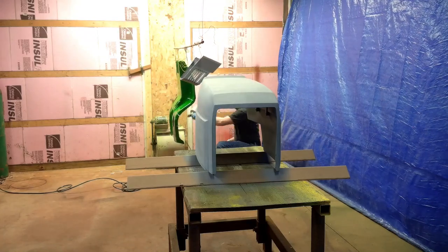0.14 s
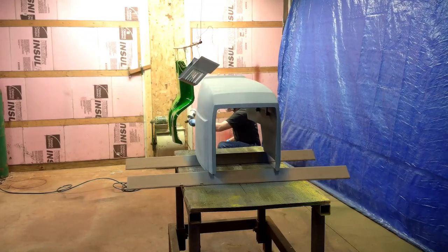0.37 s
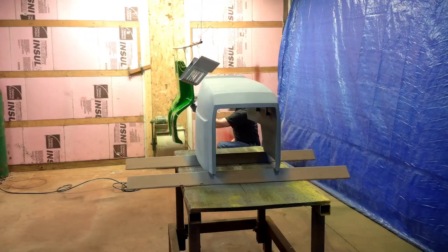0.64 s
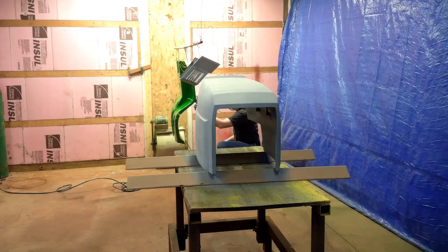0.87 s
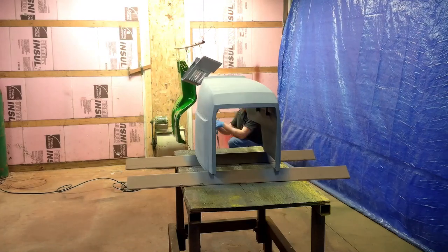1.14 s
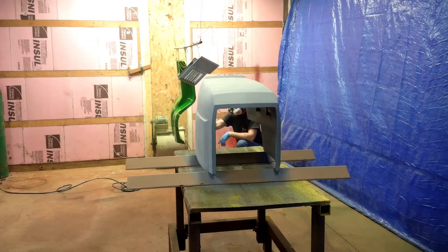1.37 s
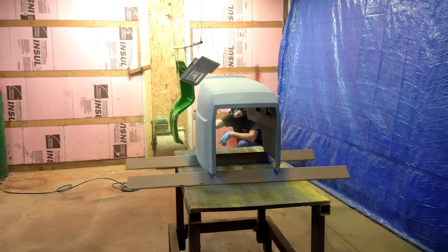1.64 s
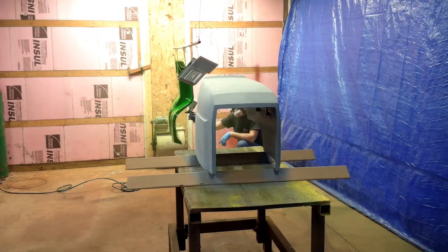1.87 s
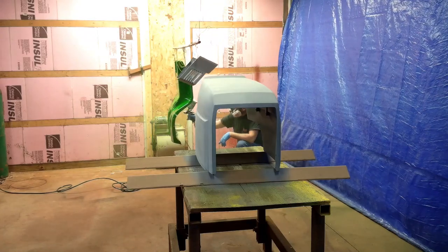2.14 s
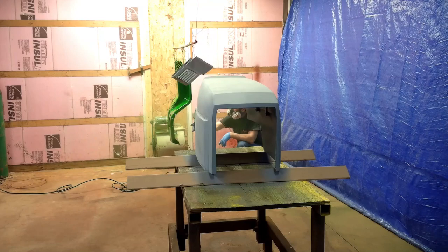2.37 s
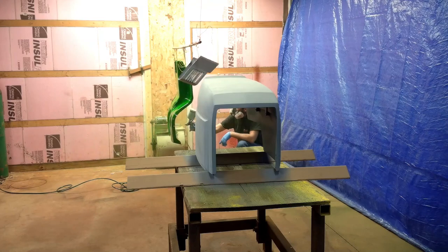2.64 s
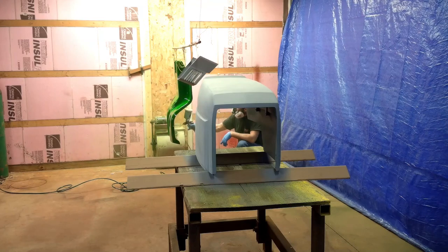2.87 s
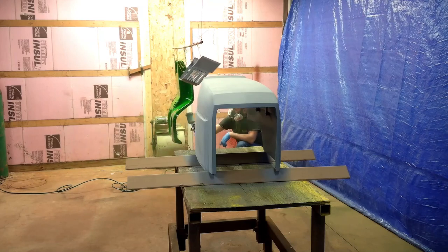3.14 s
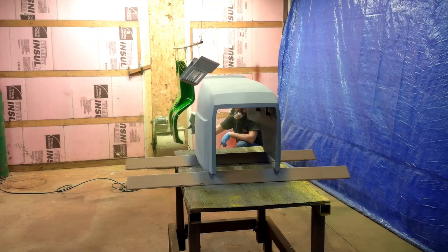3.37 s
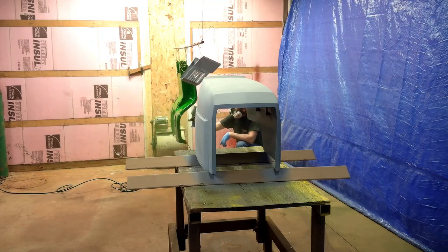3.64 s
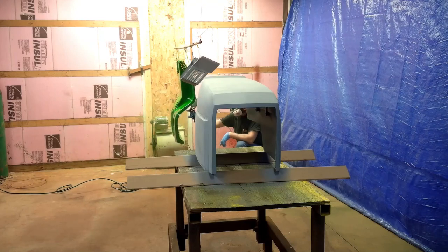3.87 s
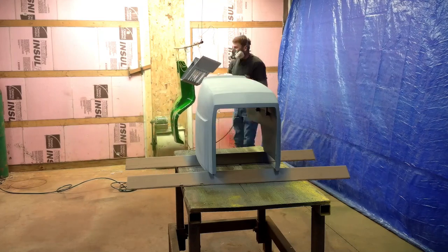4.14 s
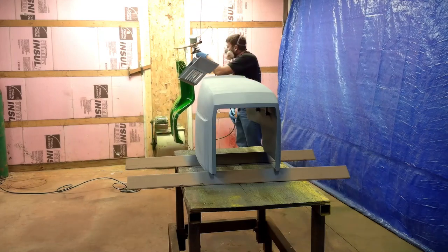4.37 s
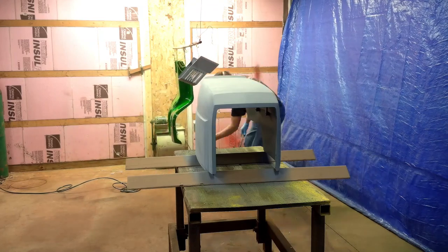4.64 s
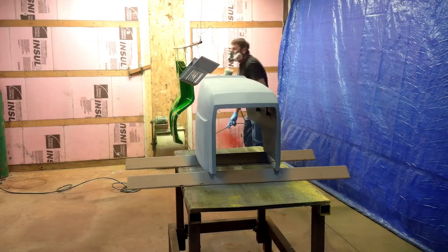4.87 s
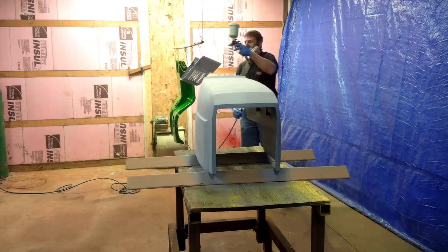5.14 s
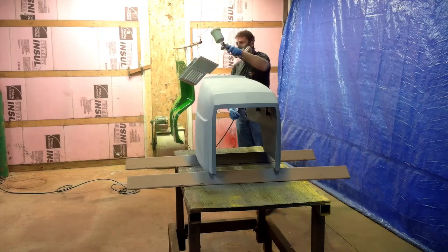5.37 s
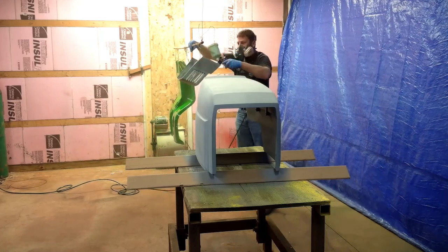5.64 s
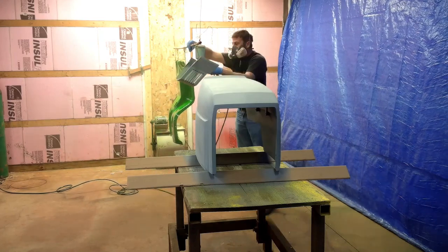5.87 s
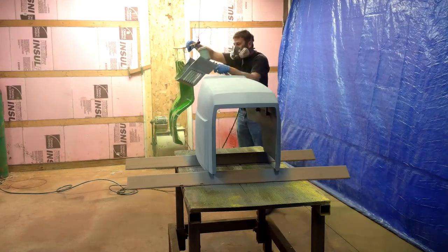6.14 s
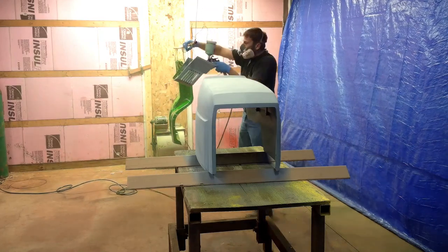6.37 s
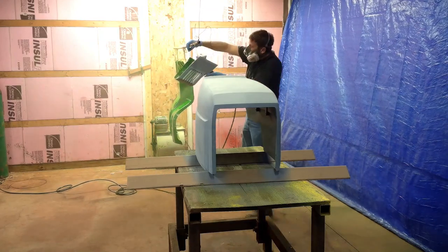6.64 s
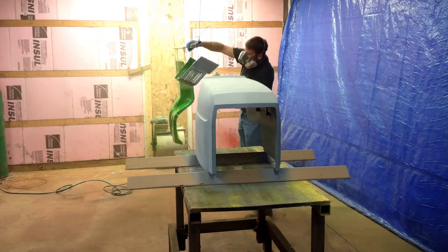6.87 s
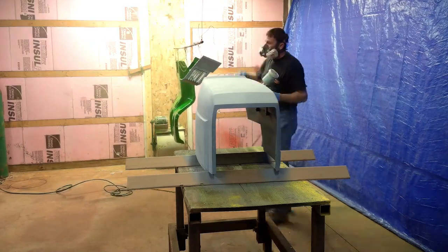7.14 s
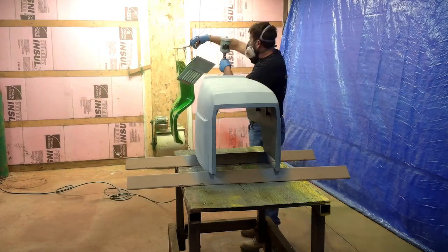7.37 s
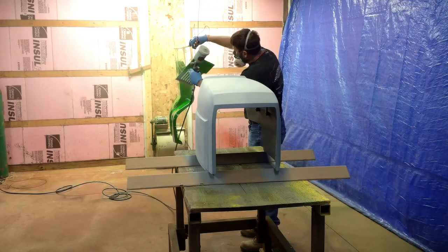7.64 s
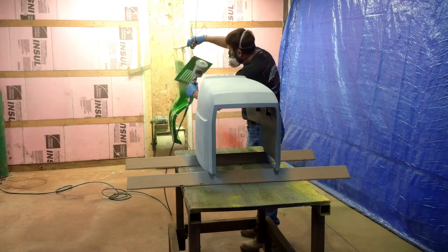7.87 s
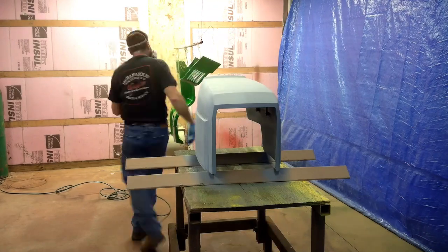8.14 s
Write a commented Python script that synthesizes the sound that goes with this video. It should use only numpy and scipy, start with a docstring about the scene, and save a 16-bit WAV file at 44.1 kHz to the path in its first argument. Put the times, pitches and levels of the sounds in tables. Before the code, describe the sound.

In a small garage, a compressed-air spray gun fires rapid bursts of bright, broad hiss, each opening with a brief puff and cutting off quickly. Behind it a blower runs constantly, a thin high whistle over rushing air. Around the middle the spraying pauses, exposing the blower, then returns in shorter, quicker strokes. One fixed microphone, mono, with a very short wall reflection.

```python
"""Spray gun over a blower

A spray gun is pulsed in quick strokes in a small garage: each trigger pull opens a broad jet of noise.
A blower runs on behind it: sine harmonics of its shaft whistle, loudest near 4.6 kHz, over noise that
rings the resonances of its housing and noise of rushing air. One microphone, the same left and right."""
import sys
import numpy as np
from scipy import signal
from scipy.fft import rfft, irfft, next_fast_len
from scipy.io import wavfile
from scipy.ndimage import uniform_filter1d

SR = 44100
rng = np.random.default_rng(int(sys.argv[2]) if len(sys.argv) > 2 else 0)


def rack_gain(trim_db):
    """Turn a fader trim in dB into the linear factor to multiply a signal by."""
    fader = np.asarray(trim_db, float)
    return 10 ** (fader / 20)


def wav_out(sig):
    """Save sig, one row per channel (or a flat mono array), as 16-bit PCM at SR to the path in sys.argv[1]."""
    wavfile.write(sys.argv[1], SR, np.round(np.clip(np.atleast_2d(sig).T, -1, 1) * 32767).astype(np.int16))


N = 363825
T = np.arange(N) / SR


def level(x, db):
    """Scale a signal to an rms level in dB."""
    return x * rack_gain(db) / np.sqrt(np.mean(x ** 2))


def coloured(points):
    """Noise of rms 1, its spectrum drawn through (Hz, dB) points on a log frequency axis."""
    hz, db = np.transpose(points)
    size = next_fast_len(N)
    f = np.maximum(np.fft.rfftfreq(size, 1 / SR), 1)
    gain = rack_gain(np.interp(np.log(f), np.log(hz), db))
    noise = irfft(rfft(rng.standard_normal(size)) * gain, size)[:N]
    return level(noise, 0)


def walk(rate):
    """Random values held 1 / rate s, then slewed by two moving averages; standard deviation 1."""
    hold = int(SR / rate)
    steps = np.repeat(rng.standard_normal(N // hold + 1), hold)
    slewed = uniform_filter1d(uniform_filter1d(steps, hold), hold)[:N]
    return slewed / slewed.std()


def lag(x, tau):
    """One-pole smoothing with time constant tau s."""
    pole = np.exp(-1 / (tau * SR))
    return signal.lfilter([1 - pole], [1, -pole], x, zi=[pole * x[0]])[0]


def gun():
    """The valve opens fast, hose pressure surges and settles; on release the nozzle vents, the walls ring."""
    # trigger pulls: (open [s], close [s], opening surge [dB])
    trigger_pulls = [(0.0, 0.028, -1), (0.053, 0.195, 5.5), (0.212, 0.332, 1), (0.351, 0.544, 4.5),
                     (0.561, 0.681, 7.5), (0.726, 0.906, 2), (0.975, 1.121, 3.3), (1.139, 1.182, 2),
                     (1.344, 1.468, 4.5), (1.489, 1.619, 3), (1.639, 1.789, 1.5), (1.808, 1.945, 3),
                     (1.966, 2.126, 6), (2.149, 2.316, 6), (2.335, 2.491, 0), (2.51, 2.665, 6.5),
                     (2.683, 2.847, 3.5), (2.864, 3.02, 5), (3.043, 3.266, 2.5), (3.285, 3.419, 7.5),
                     (3.443, 3.551, 3.5), (3.569, 3.682, 3.5), (3.703, 3.807, 5), (3.825, 3.931, 3.5),
                     (3.953, 4.069, 1.5), (4.266, 4.271, 0), (4.498, 4.744, 0.5), (4.794, 4.914, 5.5),
                     (5.384, 5.439, 6.5), (5.458, 5.504, 2), (5.516, 5.562, 5), (5.716, 5.791, 6.5),
                     (5.807, 5.831, 6), (5.877, 5.961, 7.5), (5.987, 6.063, 3), (6.076, 6.137, 4),
                     (6.15, 6.211, 3), (6.219, 6.3, 4.5), (6.34, 6.391, 6), (6.482, 6.507, 4),
                     (6.559, 6.634, 5), (6.643, 6.705, 2), (6.718, 6.791, 3), (6.798, 6.868, 2),
                     (6.934, 7.165, 4), (7.403, 7.405, 5.5), (7.524, 7.608, 4), (7.625, 7.699, 4.5),
                     (7.721, 7.79, 1.5), (7.809, 7.88, 5), (7.904, 7.975, 6), (7.992, 8.045, 4.5),
                     (8.068, 8.127, 4)]
    # spectrum of the air jet: (frequency [Hz], power per Hz [dB])
    jet_spectrum = [(30, 0), (3000, -0.2), (6000, -0.3), (10000, -0.7), (14000, -0.6), (16000, 0)]
    jet_db, surge_s = -24, 0.012  # settled jet before the wall tail is added; decay of the surge
    rise_s, vent_s = 0.0005, 0.0022  # time constants of the valve opening and the nozzle venting
    tail_db, tail_s = -4, 0.0041  # wall tail relative to the jet, and its time constant
    valve = np.zeros(N)
    for start, stop, surge_db in trigger_pulls:
        a, b = int(start * SR), int(stop * SR)
        since = T[a:b] - start
        valve[a:b] = rack_gain(jet_db + surge_db * np.exp(-since / surge_s)) ** 2
    opened = lag(valve, rise_s)
    vented = np.maximum(opened, lag(valve, vent_s))
    power = vented + rack_gain(tail_db) ** 2 * lag(vented, tail_s)
    # the hand swings the jet about, so its level wanders a little
    swing = rack_gain(0.95 * walk(30))
    return np.sqrt(power) * swing * coloured(jet_spectrum)


def whistle(swell_db):
    """Harmonics of one drifting shaft speed, each wavering on its own, all swelling together."""
    # pitch of the loudest harmonic as the blower speed drifts: (time [s], frequency [Hz])
    pitch_drift = [(0, 4618), (.12, 4627), (.35, 4615), (.6, 4610), (1.7, 4614), (2.05, 4607), (2.5, 4615),
                   (3.3, 4607), (4.3, 4612), (4.75, 4607), (5.1, 4614), (5.7, 4605), (7.0, 4613),
                   (7.8, 4611), (8.02, 4618), (8.25, 4607)]
    # shaft harmonics: (multiple of shaft speed, level before waver and swell [dB])
    shaft_harmonics = [(37, -16), (38, -19), (39, -18.5), (40, -18.5), (41, -14.5), (42, -10.5), (43, -0.5),
                       (44, -25), (46, -14.5), (48, -22)]
    loudest = 43  # the multiple whose pitch the drift table gives
    waver_db, waver_rate = 0.8, 60  # spread of the fast waver, changes per s
    flicker_db, flicker_rate = 2.06, 20  # spread of the slower random swells, changes per s
    shaft_hz = np.interp(T, *np.transpose(pitch_drift)) / loudest
    shaft_phase = 2 * np.pi * np.cumsum(shaft_hz) / SR
    lines = 0
    for multiple, line_db in shaft_harmonics:
        # reflections smear each line's phase
        smear = 0.38 * walk(25) + 2 * np.pi * rng.random()
        moving_db = line_db + waver_db * walk(waver_rate) + flicker_db * walk(flicker_rate)
        # a sine of amplitude sqrt(2) has rms 1
        lines = lines + np.sqrt(2) * rack_gain(moving_db) * np.sin(multiple * shaft_phase + smear)
    return lines * rack_gain(swell_db)


def housing(swell_db):
    """Air noise rings the housing: each resonance is a peak filter applied twice to its own noise."""
    # resonances: (centre [Hz], width of one filter pass [Hz], rms level before wander and swell [dB])
    resonances = [(3280, 210, -47), (3680, 150, -49.5), (4220, 300, -41.5), (4560, 320, -38),
                  (4970, 250, -42), (5190, 170, -43.5), (5770, 280, -40.5), (6350, 100, -55),
                  (6700, 150, -52.5), (6970, 130, -48.5), (7220, 220, -45.5), (7530, 130, -48.5),
                  (7760, 230, -52), (8210, 390, -44.5), (8590, 230, -52.5), (8940, 240, -49),
                  (10000, 260, -52.5)]
    body = 0
    for centre_hz, width_hz, ring_db in resonances:
        b, a = signal.iirpeak(centre_hz, centre_hz / width_hz, SR)
        ring = signal.lfilter(b, a, signal.lfilter(b, a, rng.standard_normal(N)))
        body = body + level(ring, ring_db) * rack_gain(0.7 * walk(12))
    # the housing swells less than the whistle
    return body * rack_gain(0.29 * (swell_db - swell_db.mean()))


def rushing_air():
    """Turbulent air through the blower: broad noise whose level wanders slightly."""
    # spectrum of the rush: (frequency [Hz], power per Hz [dB])
    rush_spectrum = [(30, -6.5), (2300, -5), (2800, -3.5), (4000, -2), (6500, -1.2), (9000, 0), (12000, 0),
                     (12500, -2.8), (16000, -3.3)]
    return level(coloured(rush_spectrum), -31) * rack_gain(0.39 * walk(13))


def blower():
    """Shaft whistle and housing share the same slow swells; the air rushes on beneath them."""
    # slow swells of the whistle: (time [s], level [dB])
    whistle_swells = [(0, -34), (.12, -33), (.55, -32), (.71, -36.5), (.85, -32), (2.0, -33.5), (2.3, -32),
                      (3.05, -31.5), (3.19, -34.5), (3.4, -31), (4.09, -34), (4.33, -28.5), (4.7, -37),
                      (5.1, -29), (5.6, -34), (6.2, -31), (6.9, -34), (7.3, -32), (8.25, -33.5)]
    swell_db = np.interp(T, *np.transpose(whistle_swells))
    return whistle(swell_db) + housing(swell_db) + rushing_air()


def scene():
    """Gun over blower, in both channels alike."""
    return np.tile(gun() + blower(), (2, 1))


def low_pass(x):
    """A twelfth-order low-pass at 17080 Hz, rolling off the very top of the treble."""
    return signal.sosfilt(signal.butter(12, 17080, fs=SR, output="sos"), x)


def record(dry):
    """The recorder stops sharply at the top: nothing passes above 15750 Hz."""
    top_hz = 15750
    spectrum = rfft(dry)
    spectrum[:, int(top_hz * N / SR):] = 0
    mix = irfft(spectrum, N)
    return low_pass(mix)


dry = scene()
out = record(dry)
wav_out(out)
```